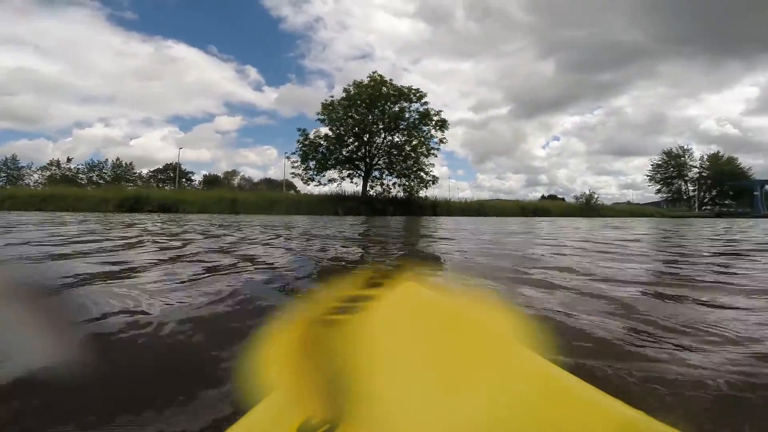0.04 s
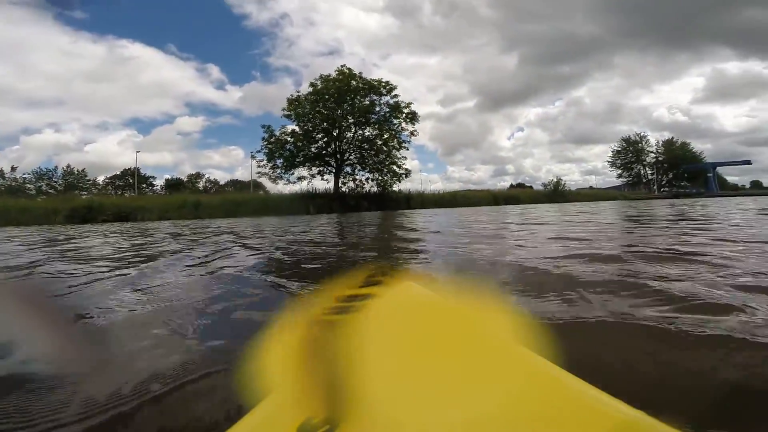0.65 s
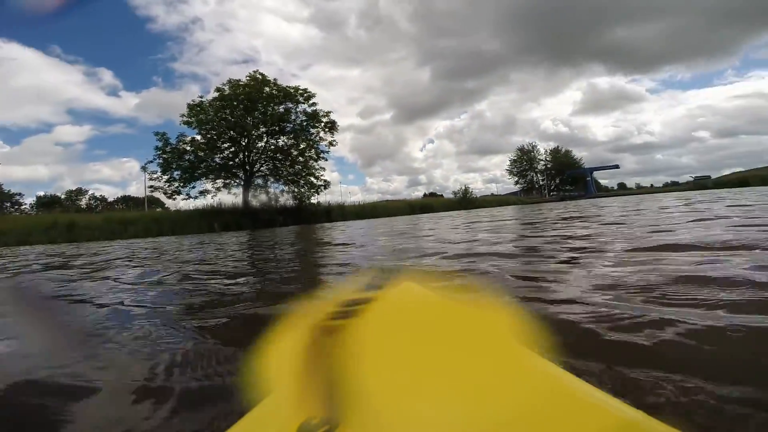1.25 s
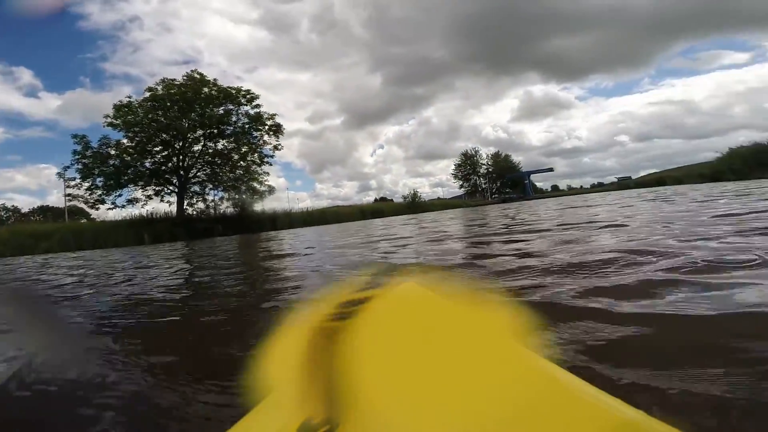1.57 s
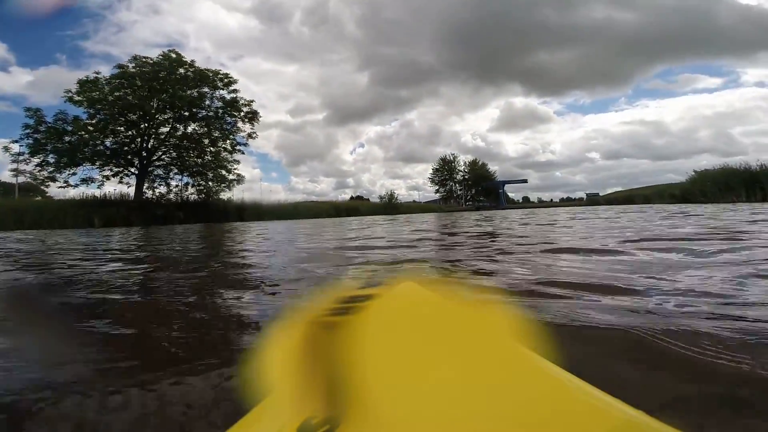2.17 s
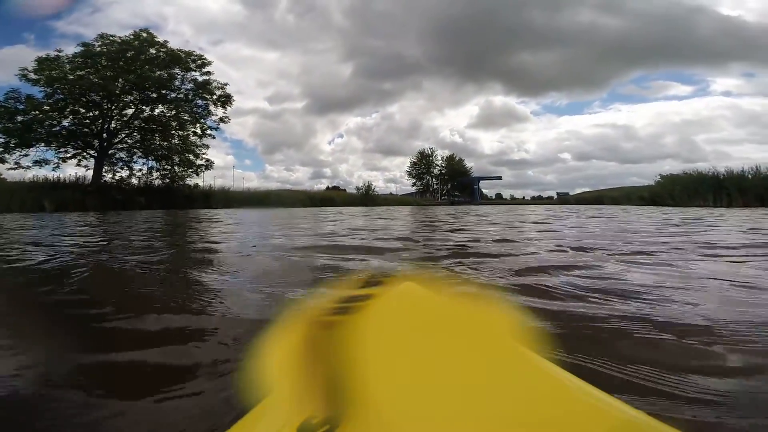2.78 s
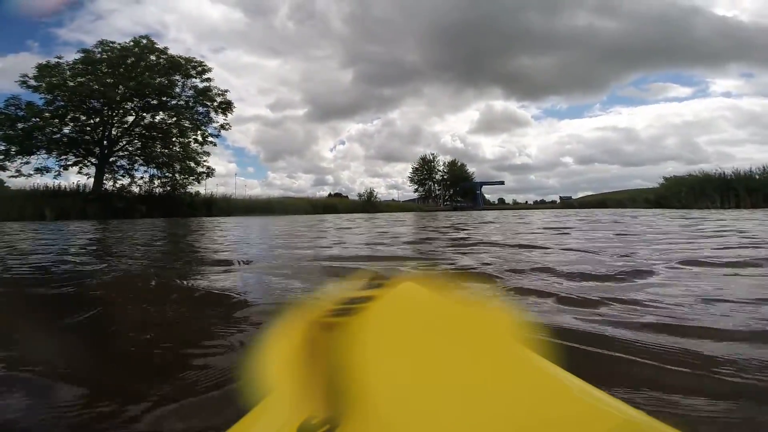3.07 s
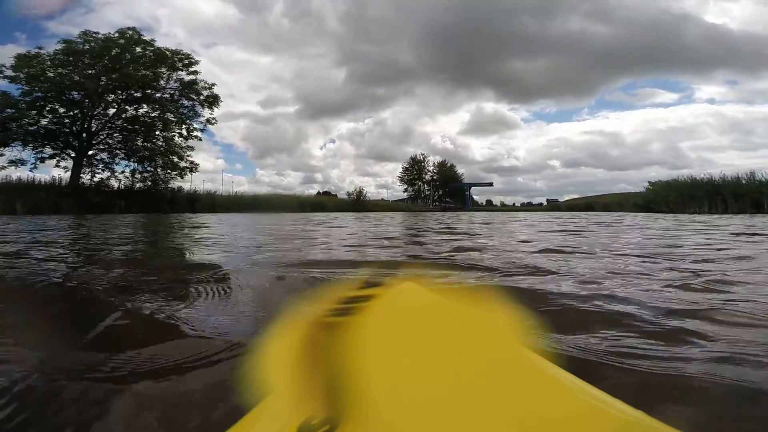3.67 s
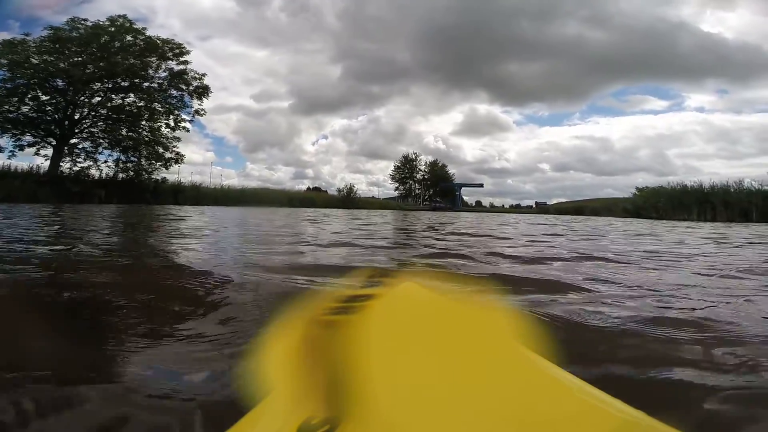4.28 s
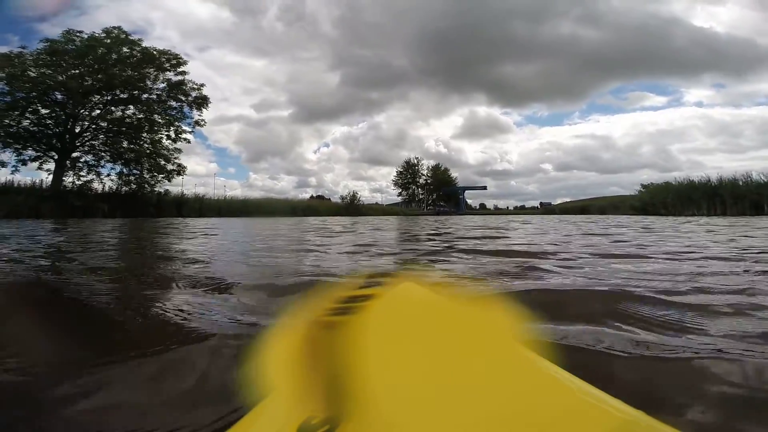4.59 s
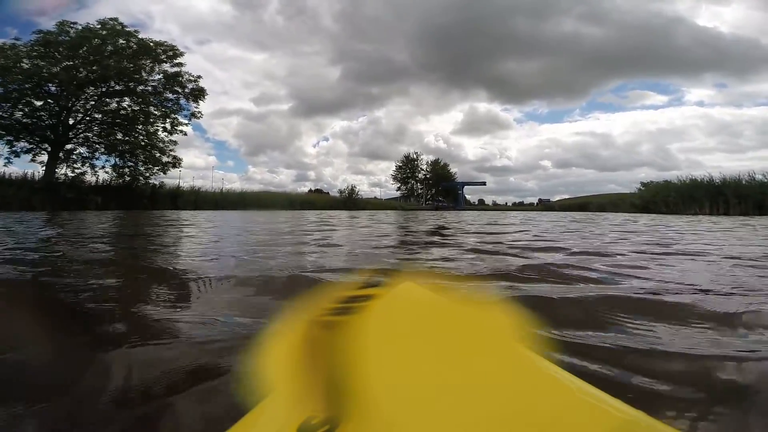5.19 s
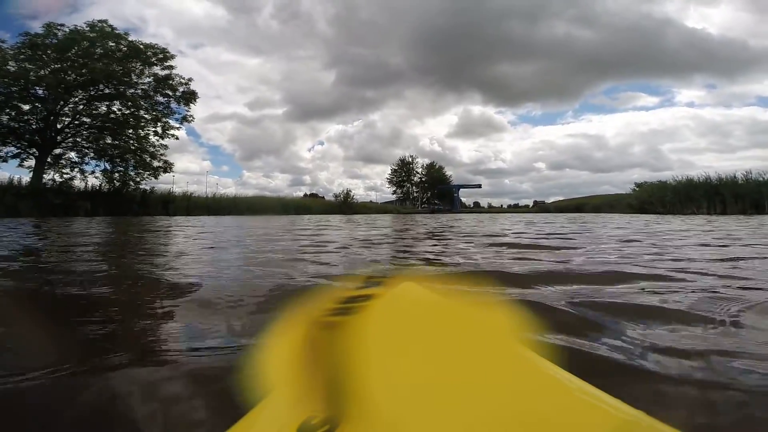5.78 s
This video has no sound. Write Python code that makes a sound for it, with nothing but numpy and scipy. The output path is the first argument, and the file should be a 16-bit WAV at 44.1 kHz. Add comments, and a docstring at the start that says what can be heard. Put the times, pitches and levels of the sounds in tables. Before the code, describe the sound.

A small electric model boat is heard close up from its deck on open water. Its steering servo whines and rasps briefly at the start and again around 0.4 seconds, with plastic knocks and a little gurgle. At 0.75 seconds the motor revs up, loudest around 0.9 to 1.1 seconds: the hull booms, the motor whines and the propeller churns with spray, sharp plops and a wind rumble. It dips near 1.3 seconds, surges again around 1.5 and winds down by 1.9 with a faint fizz.

The rest is much quieter. The servo keeps up a fast, dry chatter with a low hum until the end, over a soft wash of water. Drops and bubbles plop between 2 and 2.4 seconds and again near 3.7. A low gust rumbles from about 2.8 to 4 seconds. Two ripples softly slap the hollow hull at 4.6 and 5 seconds.

```python
"""A small electric model boat on open water, heard from its own deck.
Its rudder servo (a tiny geared steering motor) swings twice with a whine and a rasp. Then the
brushless motor gives two bursts: the shaking shaft makes the hull boom and the propeller churns.
The boat drifts on. The servo chatters as it holds its place, drops and bubbles plop,
a gust rumbles past and two ripples slap the hull."""
import sys
import numpy as np
from scipy import signal
from scipy.fft import rfft, irfft, next_fast_len
from scipy.io import wavfile
from scipy.ndimage import uniform_filter1d

SR = 44100
rng = np.random.default_rng(int(sys.argv[2]) if len(sys.argv) > 2 else 0)


def digitize_waveform(pressure):
    """Quantize a signal to 16-bit integers and store it at the path in sys.argv[1].

    Rows of a 2-D input are taken as channels; values are limited to [-1, 1].
    """
    field = np.atleast_2d(pressure).T
    bounded = np.clip(field, -1, 1)
    quanta = np.round(bounded * 32767).astype(np.int16)
    wavfile.write(sys.argv[1], SR, quanta)


N = 261954
TIME = np.arange(N) / SR


def from_db(db):
    """Turn decibels into a number to multiply by."""
    return 10 ** (np.asarray(db) / 20)


def rms_one(x):
    """Scale a sound so its average strength (rms) is 1."""
    return x / np.sqrt(np.mean(x ** 2) + 1e-20)


def steady(x, size=1500):
    """Hold the strength near 1, judged over windows of `size` samples."""
    power = uniform_filter1d(uniform_filter1d(x ** 2, size), size)
    return x / np.sqrt(np.abs(power) + 1e-12)


def curve(rows):
    """Join (time_s, value) points with straight lines."""
    return np.interp(TIME, *np.transpose(rows))


def sounding(start_s, stop_s, attack_s, release_s):
    """Fade in from the start, hold, and fade out after the stop."""
    return np.clip((TIME - start_s) / attack_s, 0, 1) * np.clip(1 - (TIME - stop_s) / release_s, 0, 1)


def drift(per_s):
    """A random wobble of strength 1 that heads for a new value `per_s` times a second."""
    points = rng.standard_normal(8192)
    return rms_one(np.interp(TIME * per_s, np.arange(len(points)), points))


def grains(per_s, spread_db):
    """A crackle of random clicks of uneven size."""
    sizes = from_db(spread_db * np.minimum(rng.exponential(1, N), 4)) * rng.choice([-1, 1], N)
    return rms_one(sizes * (rng.random(N) < per_s / SR))


def clicks(times_s, heights):
    """One click at each given time."""
    out = np.zeros(N)
    np.add.at(out, np.clip(np.round(np.asarray(times_s) * SR).astype(int), 0, N - 1), heights)
    return out


def filtered(x, order, edge_hz, keep="low"):
    """Keep the low or the high part of a sound; a higher order cuts more sharply."""
    return signal.sosfilt(signal.butter(order, edge_hz, keep, fs=SR, output="sos"), x)


def coloured(x, colour):
    """Shape a sound by (pitch_hz, gain_db) points, fading steeply beyond the first and last."""
    size = next_fast_len(N + 8192)
    hz = np.maximum(np.arange(size // 2 + 1) * SR / size, 1)
    points_hz, points_db = np.transpose(colour)
    octaves_outside = np.abs(np.log2(hz / np.clip(hz, points_hz[0], points_hz[-1])))
    gain_db = np.interp(np.log(hz), np.log(points_hz), points_db) - 17.3 * octaves_outside
    return irfft(rfft(x, size) * from_db(gain_db), size)[:N]


def resonate(x, notes):
    """Let a sound ring a body's own notes; a narrower note rings longer."""
    out = 0
    for k, (pitch_hz, width_hz, gain_db) in enumerate(notes):
        decay = np.exp(-np.pi * width_hz / SR)
        feedback = [1, -2 * decay * np.cos(2 * np.pi * pitch_hz / SR), decay ** 2]
        gain = (-1) ** k * from_db(gain_db) * (1 - decay ** 2) / 2
        out += gain * signal.lfilter([1, 0, -1], feedback, x + 1e-18)
    return out


def struck(blows, notes):
    """Hit a body with (start_s, peak_db) blows."""
    start_s, peak_db = np.transpose(blows)
    unit_peak = np.abs(resonate(clicks([0], [1]), notes)).max()
    return resonate(clicks(start_s, from_db(peak_db)), notes) / unit_peak


def spinning_tones(angle, tones, waver_db, wavers_per_s):
    """Tones at multiples of a turning speed, each wavering in level."""
    return sum(from_db(db + waver_db * drift(wavers_per_s))
               * np.sin(multiple * angle + rng.uniform(0, 2 * np.pi)) for multiple, db in tones)


# The hull's own low notes: pitch_hz, width_hz, gain_db
HULL_NOTES = [(140.8, 8.4, 3), (170.4, 22.2, 1.5), (192.7, 14.8, 6.5), (211.5, 26.7, -2.5)]
# Tones of the gears: multiple_of_motor_speed, level_db
GEAR_TONES = [(2, -6), (3, -7), (4, -4), (5, -5), (8, -9), (10, -13), (12, 6), (14, -8), (16, -2), (17, -5),
              (18, -1), (20, -5)]
# Tone colours of the gears' high whine and lower rasp: pitch_hz, gain_db
GEAR_WHINE_COLOUR = [(3800, -38), (4200, -10), (4900, -16.5), (5500, -2.5), (6300, 5), (6700, -19),
                     (7100, -15), (7700, -24), (8500, -15), (10100, -20), (10700, -28), (13000, -38),
                     (15000, -49)]
GEAR_RASP_COLOUR = [(150, 14.5), (260, -11), (579, -27), (728, -12.5), (1050, -18.5), (1640, -4.5),
                    (1860, -19), (2420, -1), (4000, -28.5), (5200, -38), (8800, -120)]
# Rudder moves: start_s, brake_s, stop_s, whine_db, rasp_db, hull_db, tone_in_whine_db
RUDDER_SWINGS = [(-.032, 0.054, 0.073, -42.5, -33.5, -27, -5), (0.377, 0.461, 0.499, -34.5, -31, -37, 15)]

def rudder_swings(top_turns_per_s=548, spin_up_s=.015, brake_turns_per_s2=3700, attack_s=.032):
    """The servo's motor spins up, runs and brakes; its gears whine, rasp and shake the hull."""
    out = 0
    for start_s, brake_s, stop_s, whine_db, rasp_db, hull_db, tone_db in RUDDER_SWINGS:
        age_s = np.maximum(TIME - start_s, 0)
        braking = brake_turns_per_s2 * np.maximum(TIME - brake_s, 0)
        speed = np.maximum(top_turns_per_s * (1 - np.exp(-age_s / spin_up_s)) - braking, 0)
        angle = 2 * np.pi * np.cumsum(speed * (1 + .012 * drift(300))) / SR
        tones = spinning_tones(angle, GEAR_TONES, waver_db=3.5, wavers_per_s=200)
        meshing = sounding(start_s, stop_s, attack_s, release_s=.0086) ** 4
        grit = grains(per_s=24000, spread_db=5)
        gears = 0
        for colour, clear_db, db in (GEAR_WHINE_COLOUR, tone_db, whine_db), (GEAR_RASP_COLOUR, -27, rasp_db):
            clear = from_db(clear_db) * meshing * steady(coloured(tones, colour))
            gears += from_db(db) * steady(clear + steady(coloured(grit, colour)))
        fade_in_db = -16 * np.maximum(1 - age_s / attack_s, 0)
        fade_out_db = -805.5 * np.clip(TIME - stop_s, 0, .2)
        effort = (TIME >= start_s) * from_db(fade_in_db + fade_out_db)
        hull = resonate(effort * grit, HULL_NOTES) / np.std(resonate(grit, HULL_NOTES))
        out += effort * gears + from_db(hull_db) * hull
    return out


# Strength of the wind's deep buffeting and of its gusts: time_s, level_db
BUFFET_LEVELS = [(0.0, -36.5), (0.74, -40), (0.86, -29.5), (0.91, -27), (2.4, -48.5), (2.46, -41),
                 (3.95, -38.5), (4.81, -73), (5.94, -73)]
GUST_LEVELS = [(0.0, -42.5), (0.53, -37.5), (0.56, -58), (0.84, -26), (1.14, -59), (1.34, -44.5),
               (2.03, -54), (2.78, -36), (3.51, -30.5), (3.59, -43.5), (3.84, -34.5), (4.6, -60),
               (5.74, -61), (5.94, -75)]
# Their tone colours: pitch_hz, gain_db
BUFFET_COLOUR = [(10, 4), (22, 11.5), (28, -8), (36, -26.5)]
GUST_COLOUR = [(33, -7), (45, 13.5), (54, -21), (64, -17), (78, -17), (120, -39.5)]

def wind():
    """Moving air buffets the microphone and rumbles in gusts."""
    buffet = steady(coloured(rng.standard_normal(N), BUFFET_COLOUR), size=6000)
    gust = steady(coloured(rng.standard_normal(N), GUST_COLOUR), size=3000)
    return from_db(curve(BUFFET_LEVELS)) * buffet + from_db(curve(GUST_LEVELS)) * gust


# Tone colour of water along the hull: pitch_hz, gain_db
WASH_COLOUR = [(50, 5), (100, 13.5), (250, 7.5), (400, -0.5), (700, -2.5), (1400, -1.5), (2500, -3),
               (4000, -16.5), (6000, -12), (7500, -22), (11000, -25), (15000, -35.5)]

def wash(level_db=-54):
    """Water washes along the hull with a soft, even noise."""
    return from_db(level_db) * rms_one(coloured(rng.standard_normal(N), WASH_COLOUR))


# Tone colour of churned water heard through the hull: pitch_hz, gain_db
FROTH_COLOUR = [(260, -1), (420, -1.5), (480, -14), (540, -5.5), (720, -6), (830, -1.5), (1040, -21.5),
                (1180, -0.5), (1450, -7), (1760, 1.5), (2360, -5), (3000, -12.5), (3800, -27.5)]
# Little waves breaking on the hull: peak_s, gain_db, fade_db_per_s
WAVELETS = [(0, -35.5, 158), (0.301, -48.5, 45), (2.078, -57, 16), (4.55, -82, 60)]

def gurgle(count=2000, low_hz=430, high_hz=2800, rise_db_per_s=250, fizz_db=6):
    """Each little wave sets off ringing bubbles of many sizes over the fizz of its splash."""
    level = sum(from_db(db - np.maximum(rise_db_per_s * (peak_s - TIME), fade * (TIME - peak_s)))
                for peak_s, db, fade in WAVELETS)
    when, smallness, glide, strength = rng.random((count, 4)).T
    pitch_hz = low_hz * (high_hz / low_hz) ** smallness
    ring_s = 18 / pitch_hz
    bubbles = np.column_stack([when * N / SR, 22 * strength, pitch_hz, 20 * (glide - .5), ring_s])
    fizz = rms_one(coloured(grains(per_s=1600, spread_db=1), FROTH_COLOUR))
    return level * (rms_one(plops(bubbles)) + from_db(fizz_db) * fizz)


# The notes of the servo and its mount: pitch_hz, width_hz, gain_db
MOUNT_NOTES = [(1676, 85, 2), (1787, 40, -2), (1959, 65, -10), (2237, 175, 5), (2358, 291, -2.5),
               (2832, 131, -9.5), (3154, 35, -19), (4400, 300, -58.5), (5330, 150, -24), (5700, 500, -28),
               (10350, 570, -41.5)]
# The taps that make up one clack: delay_s, level_db, spread_db, hard_kick_db
CLACK_TAPS = [(-.0016, -8, 7.5, 2), (0, -1.5, 3.3, 3), (.0009, -21, 8.5, 4), (.0036, -15.5, 5, -6.7)]
# Strength of the clacking: time_s, level_db
CHATTER_LEVELS = [(.1, -41), (.7, -48), (1.85, -48.5), (2.05, -49.5), (2.7, -47), (5.94, -45)]

def servo_chatter(first_s=.0022, every_s=.0183362, jitter_s=.000025, hum_db=-48):
    """Each control pulse kicks the servo's motor: the loose gears clack and the hull hums."""
    kicks_s = np.arange(first_s, N / SR, every_s)
    # Hunting for its place, it kicks hard (+1) and soft (-1) in turn, now and then losing step.
    hard = np.cumprod(np.where(rng.random(len(kicks_s)) < .9, -1, 1))
    taps = 0
    for k, (delay_s, db, spread_db, hard_db) in enumerate(CLACK_TAPS):
        late, strength = np.clip(rng.standard_normal((len(kicks_s), 2)), -1.25, 1.25).T
        times_s = kicks_s + delay_s + k * jitter_s * late  # later taps are looser in time
        taps += clicks(times_s, from_db(db + spread_db * strength + hard_db * hard))
    clack = filtered(resonate(taps, MOUNT_NOTES), order=4, edge_hz=1550, keep="high")
    clack = filtered(clack, order=1, edge_hz=10000)
    kicked_hull = rms_one(resonate(clicks(kicks_s, from_db(2.5 * hard)), HULL_NOTES[1:]))
    murmur = rms_one(resonate(rng.standard_normal(N), HULL_NOTES[1:]))
    hum = rms_one(kicked_hull + .5 * murmur)
    return from_db(curve(CHATTER_LEVELS)) * rms_one(clack) + from_db(hum_db) * hum


# Drops and bubbles at the hull, and the propeller's sharp bite at 0.829 s: start_s, peak_db, pitch_hz,
# rise_octaves_per_s, ring_s
DROPS = [(.256, -38, 2800, 3, 0.016), (.268, -40, 5500, 2, .0031), (.305, -23, 2150, 6, 0.012),
         (.332, -36, 4330, 0, 0.004), (.331, -36.5, 5800, 0, 0.0025), (.829, -13, 1680, 16, 0.0084),
         (.858, -14, 436, -9, .015), (.871, -15, 1340, 31, .0083), (1.069, -36.5, 9600, -3, 0.0011),
         (1.331, -42, 2820, -3.5, 0.01), (1.924, -47.5, 6000, 2, .0046), (1.984, -53.5, 4250, 0, .0087),
         (2.039, -32.5, 2030, 7, 0.0037), (2.048, -47, 1080, 15, 0.022), (2.09, -44.5, 1350, 8, 0.043),
         (2.12, -42, 490, 11, 0.023), (2.2, -50, 1570, -5, 0.018), (2.271, -53, 7540, -16.5, .003),
         (2.355, -44, 1330, -3, 0.015), (3.686, -34, 1520, 4, .015), (3.69, -39.5, 1275, 6, 0.017),
         (3.844, -45, 847, 39.5, 0.052)]

def plops(bubbles):
    """Each drop, bubble or propeller bite rings briefly with a sliding pitch."""
    out = np.zeros(N + SR)
    for start_s, peak_db, pitch_hz, rise, ring_s in bubbles:
        age_s = np.arange(int(2 * ring_s * SR)) / SR  # twice as long, to hold the faint tail
        swell = age_s / (ring_s / 5)
        tone = np.sin(2 * np.pi * np.cumsum(pitch_hz * 2 ** (rise * age_s)) / SR)
        first = int(start_s * SR)
        out[first:first + len(tone)] += from_db(peak_db) * swell * np.exp(1 - swell) * tone
    return out[:N]


# Knocks of the steering links and drive shaft: start_s, strength_db
LINKAGE_KNOCKS = [(0.3052, -19), (0.3481, -23), (0.3905, -23), (0.4958, -10), (0.5511, -25), (0.5876, -25),
                  (0.8784, -8), (0.9984, -12), (1.068, -18), (1.3314, -21), (1.893, -29), (1.929, -25),
                  (1.9804, -28)]

def linkage_knocks(gain_db=-2.5):
    """Plastic parts knock and ring the mount; being soft, they make little treble."""
    return from_db(gain_db) * filtered(struck(LINKAGE_KNOCKS, MOUNT_NOTES), order=2, edge_hz=3800)


# Jolts as the motor or servo takes hold or stops: start_s, strength_db
HULL_JOLTS = [(.412, -19), (.498, -20), (.745, -15.5), (.817, -8.5), (1.41, -13)]

def hull_jolts():
    """Water cushions each jolt, so only the hull's low notes answer."""
    return filtered(struck(HULL_JOLTS, HULL_NOTES), order=2, edge_hz=500)


# Speed of the propeller shaft: time_s, turns_per_s
SHAFT_SPEED = [(.74, 42), (.81, 63), (.86, 102), (.885, 172), (.91, 192), (.99, 190), (1.05, 167),
               (1.15, 152), (1.21, 85), (1.25, 73), (1.29, 42), (1.335, 66), (1.39, 73), (1.475, 117),
               (1.52, 165), (1.58, 170), (1.665, 137), (1.74, 68), (1.85, 15)]
# How each part of the sound grows: cruise_db, speed_doubling_db, full_load_db, slipping_db
BOOM_GROWTH = (-14.5, 6.8, 1.5, 2.5)
RATTLE_GROWTH = (-28, 4.5, 1.34, 4.5)
SPRAY_GROWTH = (-48.5, 9, 3.5, 1.5)
# Level changes as the propeller gulps air: middle_s, half_length_s, boom_db, rattle_db, spray_db
AIR_GULPS = [(0.776, 0.02, -19, 5, 19.5), (0.862, 0.034, -6, 5, 12), (1.375, 0.046, -4, 4, 5),
             (1.497, 0.023, -3.5, 5.5, 3.5), (1.807, 0.096, 5, -1, 14.5)]
MOTOR_FADE_IN_S, MOTOR_FADE_OUT_S = .0057, .049

def motor_bursts(hull_hz=169.8, swell_width_hz=9.2, swell_db=6, chop_db=1.5):
    """The motor spins the shaft and propeller: boom, whine and churn all follow its speed."""
    speed = curve(SHAFT_SPEED)
    gulps_db = sum(np.outer(db, np.exp(-((TIME - middle_s) / half_s) ** 2))
                   for middle_s, half_s, *db in AIR_GULPS)
    levels_db = [motor_level_db(*growth) for growth in (BOOM_GROWTH, RATTLE_GROWTH, SPRAY_GROWTH)]
    boom_db, rattle_db, spray_db = gulps_db + levels_db
    # The boom swells as the shaft's speed passes the hull's main note.
    boom_db += swell_db * np.exp(-((speed - hull_hz) / swell_width_hz) ** 2)
    # An uneven load on the propeller makes the speed waver.
    angle = 2 * np.pi * np.cumsum(speed * (1 + .012 * drift(160))) / SR
    whine = motor_whine(angle, speed)
    churn, froth, spray = propeller_churn(angle, speed)
    boom = from_db(boom_db) * hull_boom(angle, churn)
    rattle = from_db(rattle_db) * steady(whine + froth)
    chop = from_db(chop_db * drift(70.62))  # choppy water loads the propeller unevenly
    running = sounding(SHAFT_SPEED[0][0], SHAFT_SPEED[-1][0], MOTOR_FADE_IN_S, MOTOR_FADE_OUT_S)
    return running * (boom + chop * (rattle + from_db(spray_db) * spray))


def motor_level_db(cruise_db, doubling_db, load_db, slip_db, cruise_turns_per_s=150):
    """Louder when the shaft is fast or speeding up, and while the propeller slips."""
    speed = curve(SHAFT_SPEED)
    acceleration = uniform_filter1d(np.gradient(speed) * SR, size=1800)
    load = np.tanh(acceleration / 850)  # nears full load above 850 turns per second squared
    slip = .5 - .5 * np.tanh((TIME - 1.016) / .016)  # it grips at 1.016 s, as the boat gets going
    speed_db = doubling_db * np.log2(speed / cruise_turns_per_s)
    return cruise_db + speed_db + load_db * load + slip_db * slip


# The motor's strongest tones: multiple_of_shaft_speed, level_db
MAGNET_TONES = [(2, 4), (3, 4), (6, 2), (12, 15), (24, 19), (36, 5)]
# Tone colour of its whine through the hull: pitch_hz, gain_db
MOTOR_WHINE_COLOUR = [(300, 12.5), (385, 5.5), (530, 12), (610, 5), (1000, 3.5), (1400, -6.5), (1780, 15),
                      (2400, -1), (3000, -9), (3500, -14.5), (4200, -52)]

def motor_whine(angle, speed, other_tones_db=-3):
    """The motor's magnets tug many times a turn (cogging), making a stack of tones."""
    levels = [(k, dict(MAGNET_TONES).get(k, other_tones_db)) for k in range(2, 37)]
    tones = spinning_tones(angle, levels, waver_db=4, wavers_per_s=90)
    tones = filtered(tones, order=6, edge_hz=2700)
    fade_when_slow = np.minimum(speed / 65, 1) ** 2
    return 1.1 * steady(coloured(tones, MOTOR_WHINE_COLOUR)) * fade_when_slow


# Tone colour of the propeller's spray: pitch_hz, gain_db
SPRAY_COLOUR = [(3800, -17), (4250, -3.5), (4850, -17.5), (5450, 5), (6400, 3), (6950, -19.5), (8000, -15),
                (10100, -35), (11000, -59.5), (15000, -41.5)]

def propeller_churn(angle, speed, throb=.13):
    """Each turn throws off collapsing bubbles: their raw crackle, low froth and high spray."""
    churn = grains(per_s=2600, spread_db=1.5) * (1 + throb * np.sin(angle))
    froth_db = -.5 + 4 * np.log2(np.maximum(speed, 100) / 120)
    froth = from_db(froth_db) * steady(coloured(churn, FROTH_COLOUR))
    spray = steady(coloured(churn, SPRAY_COLOUR))
    return churn, froth, spray


# The deck's longest-ringing note: pitch_hz, width_hz, gain_db
DECK_NOTE = [(146.9, 1.7, 6.5)]

def hull_boom(angle, churn, blade_db=-13.5, shudder_db=-19.5, waver_db=1.1):
    """The off-balance shaft, two blades and bubbles shake the hull; the deck rings on."""
    shake = np.sin(angle) + from_db(blade_db) * np.sin(2 * angle)
    hull = coloured(shake, colour=[(115, -45), (142, -14.5), (165, -2.5), (205, 1), (250, -9.5)])
    deck = resonate(shake, DECK_NOTE)
    shudder = from_db(shudder_db) * rms_one(resonate(churn, HULL_NOTES + DECK_NOTE))
    return steady(hull + deck + shudder) * from_db(waver_db * drift(50))


# How the whistle grows: cruise_db, speed_doubling_db, full_load_db, slipping_db
WHISTLE_GROWTH = (-63, 4.5, 9, 1)

def controller_whistle(pitch_hz=8035, power_off_s=1.68, flutter_db=1.5):
    """The speed controller switches the power very fast, making the motor's coils sing."""
    level_db = motor_level_db(*WHISTLE_GROWTH) + flutter_db * drift(80)
    powered = sounding(SHAFT_SPEED[0][0], power_off_s, MOTOR_FADE_IN_S, MOTOR_FADE_OUT_S)
    return powered * from_db(level_db) * rms_one(np.sin(2 * np.pi * pitch_hz * TIME))


# Foam along the hull as the boat slows: middle_s, half_length_s, level_db
FOAM_SWELL = (1.75, 0.049, -62.5)
# Its tone colour: pitch_hz, gain_db
FOAM_COLOUR = [(6500, -9), (9700, 4), (10400, -9), (11000, -20)]

def foam():
    """Fine bubbles burst in a short swell of fizz."""
    middle_s, half_s, level_db = FOAM_SWELL
    swell = np.exp(-((TIME - middle_s) / half_s) ** 2 / 2)
    fizz = rms_one(coloured(grains(per_s=9000, spread_db=5), FOAM_COLOUR))
    return from_db(level_db) * swell * fizz


# Ripples hitting the hull: start_s, strength_db
RIPPLE_SLAPS = [(4.561, -32.5), (4.984, -25.5)]

def ripple_slaps(gain_db=-7):
    """A ripple slaps the hull and rings its low notes."""
    return from_db(gain_db) * struck(RIPPLE_SLAPS, HULL_NOTES)


def scene():
    """Add the steering, water, wind and motor into one channel."""
    steering = rudder_swings() + servo_chatter() + linkage_knocks()
    surroundings = plops(DROPS) + gurgle() + foam() + ripple_slaps() + wind() + wash()
    motor = motor_bursts() + controller_whistle()
    return (steering + surroundings + hull_jolts() + motor)[None]


def record(dry):
    """Round off the loudest peaks and cut the treble above 15900 Hz."""
    rounded = dry / (1 + dry ** 8) ** (1 / 8)
    return signal.sosfilt(signal.cheby2(12, 60, 15900, fs=SR, output="sos"), rounded)


dry = scene()
out = record(dry)
digitize_waveform(out)
```